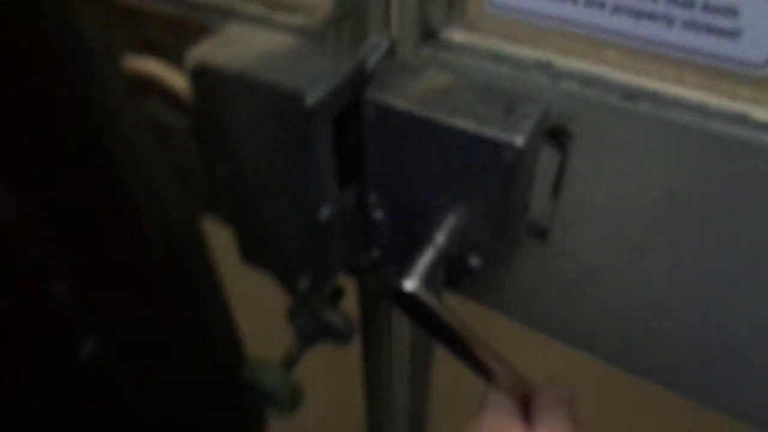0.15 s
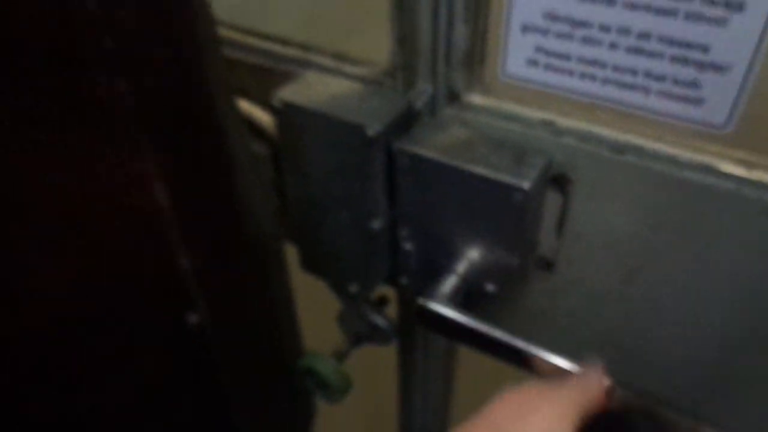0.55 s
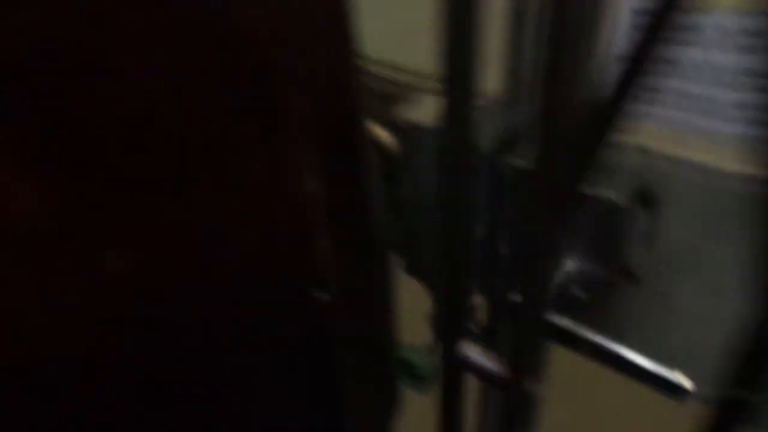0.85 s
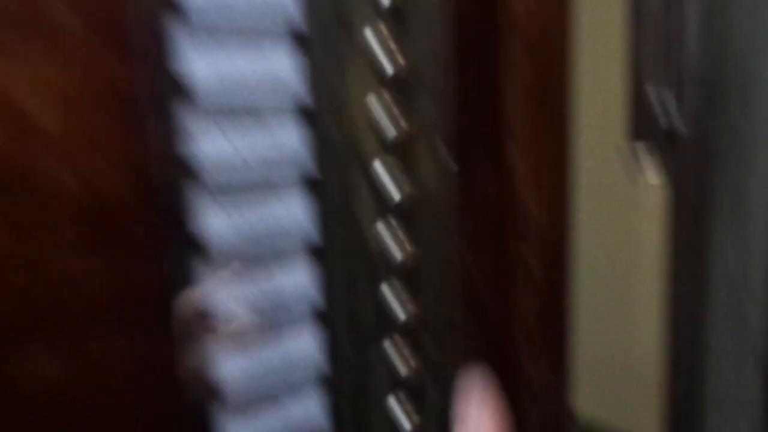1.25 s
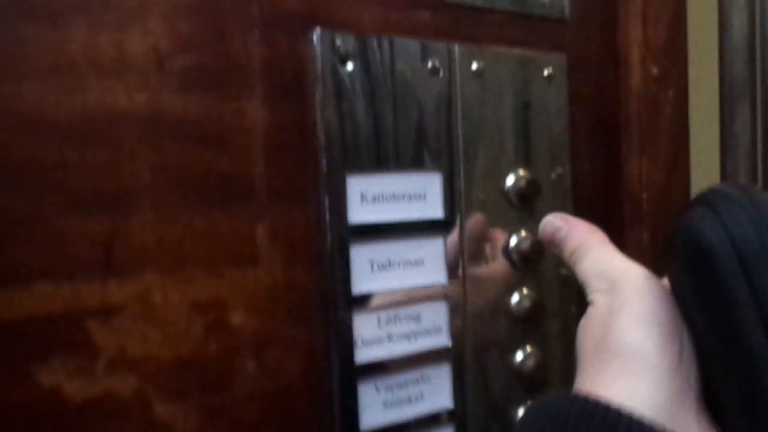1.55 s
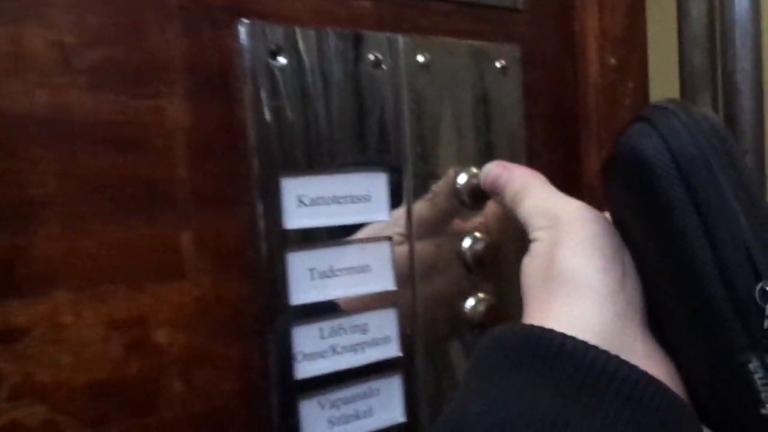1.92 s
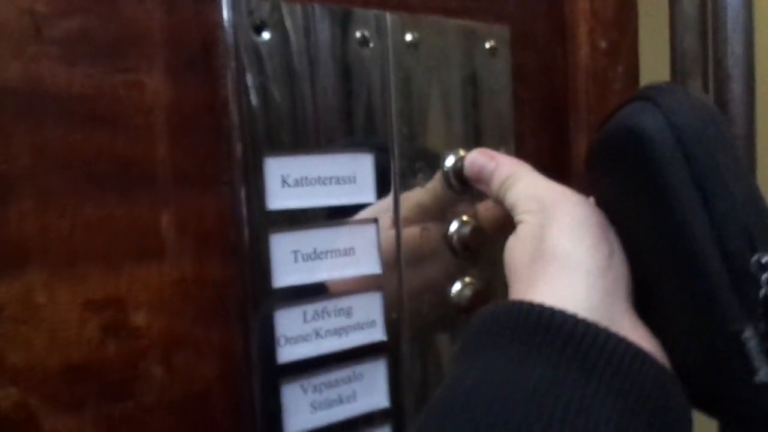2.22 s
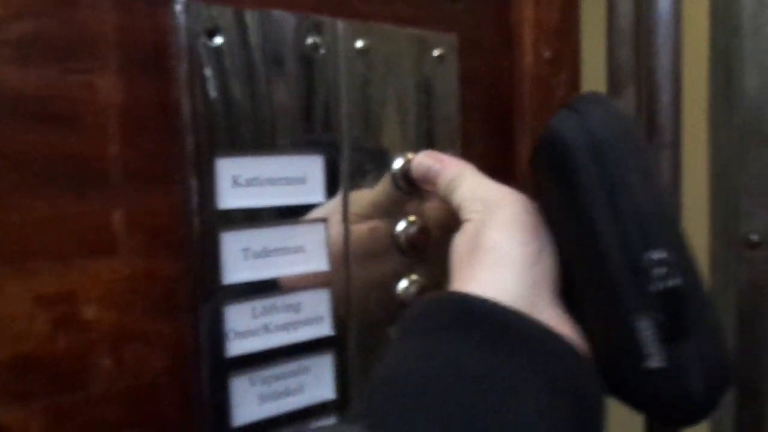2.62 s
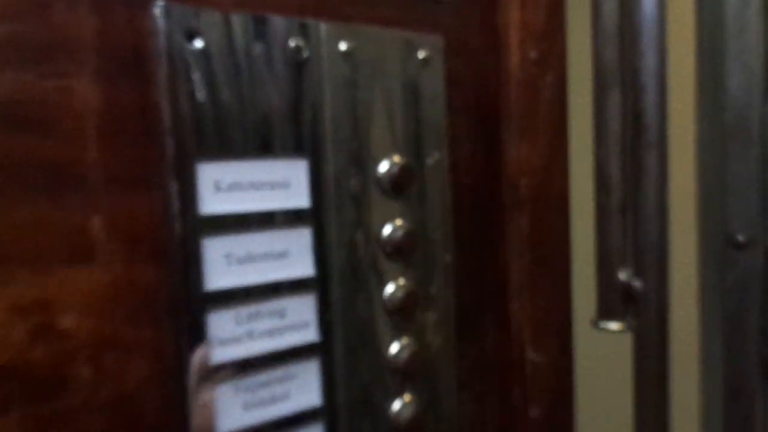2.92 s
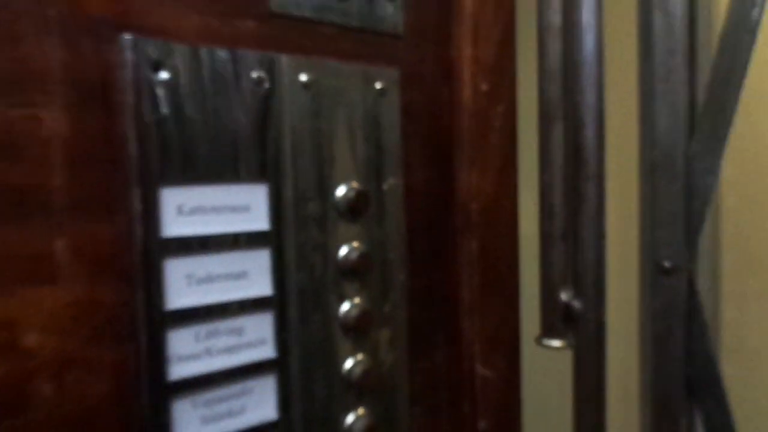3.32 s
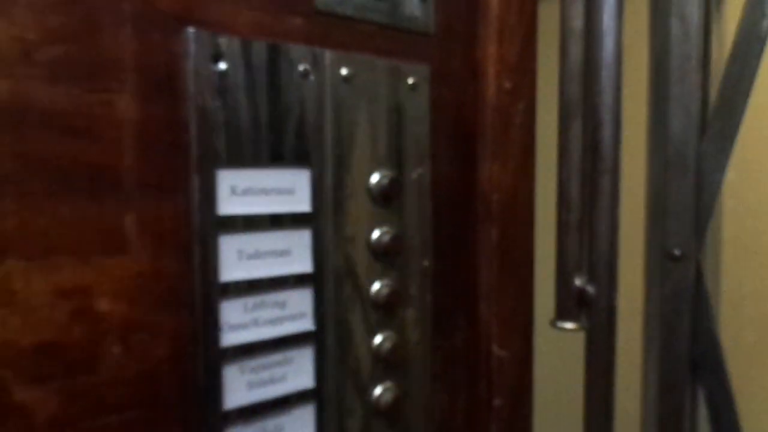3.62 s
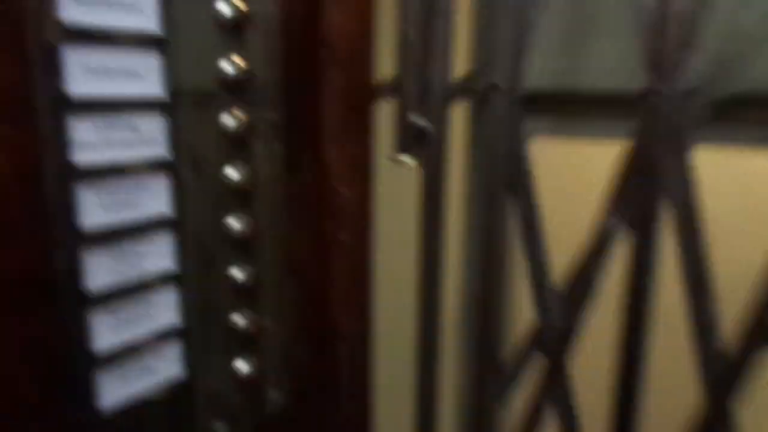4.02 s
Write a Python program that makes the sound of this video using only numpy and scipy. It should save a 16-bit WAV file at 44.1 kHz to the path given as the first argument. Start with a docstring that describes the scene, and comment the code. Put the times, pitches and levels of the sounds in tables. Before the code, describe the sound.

An old lift is closed and set going, heard by a close, nearly mono microphone. Light ticks and high squeaks lead to a door thud; the metal scissor gate clatters harshly, its peaks overloaded, and its bars shake and settle. Near silence with faint air hiss follows, then small switch clicks, a sharper brake clack and an unsteady, low motor hum with gear whirr, knocks and tiny pin ticks.

```python
"""A steel scissor gate is slammed and rattles out inside a small wooden lift car: noise bursts and damped modes.
Before it a door handle ticks, a hinge squeals (unsteady sines), the latch snaps and the door lands in its frame.
After it a button and relays click, the brake lets go with a clack and the drive hums and whirrs (tones, noise).
Loose bars shake in dense noise; the shaft echoes, and still air and a deep sway lie under everything.
The microphone is close by; the sound is nearly mono, with a faint stereo side that switches on and off."""
import sys
import numpy as np
from scipy import signal
from scipy.io import wavfile
from scipy.ndimage import uniform_filter1d

SR = 44100
rng = np.random.default_rng(int(sys.argv[2]) if len(sys.argv) > 2 else 0)


def int16_out(signal):
    """Quantize to a 16-bit WAV file."""
    q = np.round(np.clip(np.atleast_2d(signal).T, -1, 1) * 32767)
    wavfile.write(sys.argv[1], SR, q.astype(np.int16))


def level_to_linear(level):
    """Convert decibel levels to linear amplitude factors, elementwise."""
    exponent = np.asarray(level, float) / 20
    return 10 ** exponent


N = 183808

# Blows, in all six tables: start_s, level_db, thud_db (re level), brightness_db, base_t60_s,
# near_hz (the mode nearest to where the blow lands)
# the gate slams, rattles out and settles
GATE_BLOWS = [(0.856, -16.5, -11.5, -7, 0.13, 1520), (0.864, -8.5, -27.5, -19, 0.16, 1320),
              (0.902, -12.5, -21.5, -4.5, 0.075, 3000), (0.906, -7.5, -15, -10.5, 0.27, 5000),
              (0.938, -3, -18, -10.5, 0.27, 3000), (0.961, -3.5, -18.5, -12, 0.32, 1070),
              (0.989, -3, -16, -15, 0.22, 1000), (1.032, -11, -23, -15.5, 0.14, 1400),
              (1.042, -12.5, -10, -5, 0.3, 630), (1.072, -11, -21, -9.5, 0.2, 1830),
              (1.128, -20.5, -9, -3, 0.17, 3000), (1.163, -13, -8.5, -11.5, 0.19, 1400),
              (1.199, -13, -13, -15.5, 0.18, 2200), (1.242, -23, -1, -4.5, 0.061, 89),
              (1.296, -16, -9, -17.5, 0.15, 1380), (1.359, -40, -6, 2.5, 0.38, 3000),
              (1.399, -23, -8, -12, 0.21, 150), (1.425, -16.5, -18.5, -14, 0.16, 3000),
              (1.451, -16.5, -13, -12.5, 0.18, 2200), (1.501, -31.5, -4, -3.5, 0.33, 526),
              (1.537, -21, -4, -16, 0.053, 1400), (1.597, -40, -11.5, -3.5, 0.13, 1400),
              (1.636, -35, -18, -16, .2, 1410), (1.667, -38, -17, -4, 0.3, 1400),
              (1.705, -19, -15, -19.5, 0.12, 1390), (1.773, -27, -5.5, -19.5, 0.12, 600)]
# the door lands in its frame and bounces
DOOR_BLOWS = [(0.445, -11, -9.5, -19, 0.2, 1150), (0.455, -10, -11.5, -18.5, 0.11, 118),
              (0.462, -0.5, -15.5, -12.5, 0.11, 1908), (0.495, -11.5, -11, -8, 0.19, 351),
              (0.527, -8, -16, -12.5, 0.31, 247), (0.588, -11, -13.5, -21, 0.22, 1893),
              (0.63, -15, -12.5, -10.5, 0.089, 1500), (0.74, -26, -1, -10, 0.39, 1500)]
# the latch snaps
LATCH_BLOWS = [(0.3816, -11.5, -20.5, -13.5, 0.062, 1896), (0.392, -13.5, -28, -24, 0.1, 1700)]
# the swinging door and its handle tick
SWING_BLOWS = [(0.005, -32.5, -20, -8.5, 0.044, 2000), (0.035, -34.5, -18, -15.5, 0.054, 2690),
               (0.079, -33.5, -2.5, -24, 0.16, 1900), (0.15, -33.5, -22, -22, 0.11, 1000),
               (0.238, -24.5, -13, -17, 0.1, 800), (0.286, -29.5, -13, -13.5, 0.24, 3600),
               (0.301, -33.5, -15.5, -20, .1, 1650)]
# the button and relays click
CLICK_BLOWS = [(1.965, -22, -16, -15.5, 0.14, 1410), (2.056, -42, -11, -18, 0.091, 1830),
               (2.17, -22, -14, -20, 0.101, 2250), (2.184, -27, -12, -26.5, 0.12, 800),
               (2.251, -25, -14, -16.5, 0.12, 1400), (2.455, -39, -26, -17.5, 0.37, 1000)]
# the brake lets go, the moving car knocks
KNOCK_BLOWS = [(2.71, -33, -7, -19, 0.066, 1500), (2.724, -15.5, -14, -7, 0.13, 2200),
               (2.739, -23.5, -13, -30.5, 0.11, 216), (2.799, -26, -12, -41, 0.39, 950),
               (3.45, -43, -7, -17, 0.24, 1305), (3.565, -22, -8, -19, 0.29, 392),
               (3.608, -40, -17.5, -25, 0.17, 217), (3.656, -32.5, -1, -23, 0.1, 1305),
               (3.678, -31, -16, -37, 0.14, 1305), (3.72, -36, -19, -27, 0.11, 1305),
               (3.765, -30, -7, -42, 0.19, 950), (3.78, -27, -7.5, -44, 0.16, 460),
               (3.819, -32.5, -21, -16.5, 0.25, 1590), (3.93, -36, -1, -24, 0.13, 283),
               (3.953, -28.5, -13.5, -13.5, 0.16, 1850), (4.097, -49, -6, -20, 0.11, 283),
               (4.129, -37, -26, -29, 0.15, 1090)]


def evened(x):
    """Scales to rms 1."""
    return x / np.sqrt(np.mean(x ** 2) + 1e-20)


def read(points, hz):
    """Reads a table on a log-frequency axis."""
    f, value = np.transpose(points)
    return np.interp(np.log(hz + 1), np.log(f + 1), value)


def columns(rows):
    """Curve columns sample by sample, and a mask that is 1 while the curve lasts, with 1.5 ms ramps."""
    s, *values = np.transpose(rows)
    t = np.arange(N) / SR
    on = np.clip(np.minimum(t - s[0], s[-1] - t) / 0.0015, 0, 1)
    return on, *(np.interp(t, s, v) for v in values)


def shaped(x, gain):
    """Minimum-phase filter with the spectral shape gain(hz), scaled to unit energy."""
    log_gain = np.log(np.maximum(gain(abs(np.fft.fftfreq(8192, 1 / SR))), 1e-5))
    taps = np.fft.ifft(np.exp(np.conj(signal.hilbert(log_gain)))).real[:4096]
    return signal.oaconvolve(x, taps / np.linalg.norm(taps))[:len(x)]


def rings(hz, modes):
    """Magnitude of a set of resonances, their powers added."""
    return np.sqrt(sum(level_to_linear(2 * db) / (1 + (2 * (hz - f) / width) ** 2) for f, width, db in modes))


def band(hz, low_hz, high_hz):
    """Smooth band-pass magnitude."""
    return 1 / np.sqrt((1 + (low_hz / (hz + 1)) ** 10) * (1 + (hz / high_hz) ** 10))


def wander(count, size):
    """Smooth random drift of rms 1, about size samples a wiggle."""
    once = uniform_filter1d(rng.standard_normal(count), size=size)
    return evened(uniform_filter1d(once, size=size))


def contacts(per_s, spread_db, last_s, steady):
    """Envelope of many small knocks, a few stronger, over a steady share."""
    strength = level_to_linear(spread_db * np.minimum(rng.exponential(1, N + SR), 4))
    knocks = strength * (rng.random(N + SR) < per_s / SR)
    return evened(steady + signal.lfilter([1], [1, -np.exp(-1 / (last_s * SR))], knocks))


def tone(rows, waver_hz, flutter_db, size):
    """A sine on a pitch and level curve (s, Hz, rms dB), both made unsteady."""
    on, hz, db = columns(rows)
    phase = 2 * np.pi * np.cumsum(hz + waver_hz * wander(N, size)) / SR
    return np.sqrt(2) * on * level_to_linear(db + flutter_db * wander(N, size)) * np.sin(phase)


def struck_car(thud, blow, clink, crack):
    """Four noise drives ring the wooden panels, the long bars, the short bars and the bright pin joints."""
    # resonances of gate and door frame: pitch_hz, width_hz, level_db
    steel_modes = [(1035, 210, 4.5), (1904, 870, 4), (2405, 460, 0), (2760, 26, -28.5), (3387, 210, -17),
                   (3770, 67, -8), (4460, 220, -8.5), (5420, 11, -3.5), (6140, 65, -56)]
    # resonances of the wooden car: pitch_hz, width_hz, level_db
    cabin_modes = [(118, 75, -7), (160, 19, 4), (230, 51, 7.5), (267, 36, -5.5), (304, 26, 0.5),
                   (360, 120, 5.5), (384, 13, 1), (460, 31, 1), (557, 56, 2)]
    # colour of the steel between its resonances: pitch_hz, relative_level_db
    steel_body = [(290, -44.5), (500, -4), (668, 11), (1070, 10.5), (1430, 6), (2320, -3), (9000, -4),
                  (11700, -1), (19800, -120)]
    # colour of the pin joints: pitch_hz, relative_level_db
    pin_colour = [(3530, -43.5), (6000, 0), (9220, 5.5), (13100, 6.5), (15000, -4), (15500, -42.5),
                  (15600, -5.5)]

    def steel(hz):
        return level_to_linear(read(steel_body, hz) - 2.0) + rings(hz, steel_modes)

    panels = shaped(thud, lambda hz: rings(hz, cabin_modes) * band(hz, 90, 750))
    sway = level_to_linear(-19.5) * shaped(thud, lambda hz: band(hz, 36, 60))  # the car sways under thuds
    long_bars = shaped(blow, lambda hz: steel(hz) * band(hz, 430, 3060))
    short_bars = shaped(clink, lambda hz: steel(hz) * band(hz, 2820, 7000))
    pins = shaped(crack, lambda hz: level_to_linear(read(pin_colour, hz)) * band(hz, 5100, 20000))
    return panels + sway + long_bars + short_bars + pins


def blows():
    """Each blow is a burst of tiny contacts; the treble dies first, the thud rises slowly and lasts."""
    drives, t = np.zeros((4, N + SR)), np.arange(SR // 2) / SR
    # rows: thud, blow, clink, crack
    lasts = np.array([[1.6], [1.05], [.8], [.65]])  # share of the blow's t60
    rise_s = np.array([[.006], [.0012], [.0005], [.0003]])
    chatter = contacts(per_s=460, spread_db=2.5, last_s=0.0045, steady=1.0)
    every_blow = SWING_BLOWS + LATCH_BLOWS + DOOR_BLOWS + GATE_BLOWS + CLICK_BLOWS + KNOCK_BLOWS
    for s, db, thud_db, bright_db, t60, _ in every_blow:
        clink_db = -1.5 + 0.85 * bright_db
        crack_db = -4.5 + 1.26 * bright_db
        layer_db = db + np.array([[thud_db], [-9.0], [clink_db], [crack_db]])
        at = round(s * SR)
        fade = level_to_linear(layer_db - 60 * t / (lasts * max(t60, .01))) * (1 - np.exp(-t / rise_s))
        fade[2:] *= 1 + 0.68 * np.exp(-t / 0.001)  # the snap of first contact
        # a firm front, then chatter
        fade[1:] *= 1 + 0.35 * (chatter[at:at + len(t)] - 1) * (1 - np.exp(-t / 0.0083))
        drives[:, at:at + len(t)] += fade * rng.standard_normal((len(t), 4)).T
    return struck_car(*drives)[:N]


def rung():
    """Modes of every struck thing, once per blow, weaker far from the point of contact: (s, dB, Hz, t60 s)."""
    # modes of each struck thing, in all six tables: pitch_hz, level_db (re the blow), t60_s
    gate_modes = [(89, -8, .8), (526, -3.5, 0.12), (630, -5, 0.09), (1070, -4.5, .09), (1830, -7, 0.073),
                  (2200, -7, 0.12), (3000, -23, 0.025)]
    door_modes = [(118, -6.5, 0.48), (247, -10.5, .35), (351, -6, 0.09), (600, -6, .08), (790, -2.5, .12),
                  (942, 3.5, 0.024), (3120, 0.5, 0.091)]
    latch_modes = [(1718, 10.5, .02), (2114, -1, 0.048), (2330, -1, 0.037), (4280, 2, .035)]
    swing_modes = [(1080, 0.5, .09), (1650, -2, .3), (2690, -5, 0.18), (3360, -3.5, 0.12), (3860, -13, .06),
                   (4226, 0, .035)]
    click_modes = [(916, -5, .045), (1084, -4, 0.095), (1386, -16, 0.032), (1830, -5.5, 0.072),
                   (2250, -4, 0.042)]
    knock_modes = [(216.4, 0, .28), (283, 5.5, .08), (460, -3, .09), (770, -1, .12), (950, -2, .05),
                   (1305, -3.5, 0.081), (1588, 0.5, 0.062), (3974, 4.5, 0.028)]
    fall_db_per_octave, spread_db = 11, 1.5
    notes = []
    for rows, modes in [(SWING_BLOWS, swing_modes), (LATCH_BLOWS, latch_modes), (DOOR_BLOWS, door_modes),
                        (GATE_BLOWS, gate_modes), (CLICK_BLOWS, click_modes), (KNOCK_BLOWS, knock_modes)]:
        for s, db, *_, near_hz in rows:
            for hz, mode_db, t60 in modes:
                far_db = fall_db_per_octave * abs(np.log2(hz / near_hz))
                level_db = db + mode_db - far_db + spread_db * rng.standard_normal()
                notes.append((s, level_db, hz, t60))
    return notes


def pings():
    """One damped mode each, roughened by chattering contact; the shortest are dry ticks."""
    # small loose pins ticking on one note: start_s, level_db, pitch_hz, t60_s
    pin_ticks = [(3.831, -22.5, 3520, 0.003), (3.838, -29.5, 3020, .035), (3.8395, -28, 11620, 0.0034),
                 (3.848, -31.5, 4650, 0.042), (3.8483, -14, 2120, 0.0033), (3.855, -26, 2480, 0.0036),
                 (3.878, -35.5, 6700, .005), (3.8792, -25, 2270, 0.0051), (3.9745, -16.5, 4520, 0.0016),
                 (3.9748, -26, 12000, 0.0039), (4.097, -38, 2510, .005)]
    out = np.zeros(N + SR)
    for s, db, hz, t60 in rung() + pin_ticks:
        t = np.arange(round(max(t60, .1) * SR)) / SR
        soft = 1 - np.exp(-t / (0.032 * t60))
        rough = 1.09 * wander(len(t), size=60 + round(3 * SR / hz))  # radians
        phase = 2 * np.pi * (hz * t + rng.random()) + rough
        out[round(s * SR):][:len(t)] += level_to_linear(db - 60 * t / t60) * soft * np.sin(phase)
    return out[:N]


def shake():
    """Loose bars and pins knock densely, each knock dying within milliseconds."""
    # curve of the shaking: time_s, level_db, brightness_db, boom_db (of the car)
    shaking = [(0.0, -46.5, 3, -1), (0.066, -46.5, -10, -4), (.096, -45, -9, 4), (0.248, -43.5, -2.5, -0.5),
               (0.37, -45, -11.5, 5), (0.44, -38, -2.5, 4.5), (0.46, -36.5, 8, 18), (0.564, -33, -5.5, 0.5),
               (0.74, -37, -6, 5), (0.84, -36, -14.5, -18), (0.896, -40, -6, 7), (0.906, -29.5, 16, 9.5),
               (0.972, -22, 9, 3.5), (1.036, -24.5, 4.5, 2), (1.118, -26, 1, 0.5), (1.134, -24.5, 6, -2),
               (1.21, -29.5, 4, 3.5), (1.384, -38, -2.5, -9), (1.498, -44.5, 6.5, -1),
               (1.65, -44.5, -9, -6), (1.786, -46, -10, 9), (1.852, -67.5, -19, 14), (1.95, -67, -22, 21)]
    on, db, bright_db, boom_db = columns(shaking)
    clink_db = -1.1 + bright_db
    sizzle_db = -4 + 1.22 * bright_db
    swarm = contacts(per_s=260, spread_db=5.0, last_s=0.013, steady=0.55)[:N]
    z = rng.standard_normal((N, 4)).T * on * level_to_linear(db)
    z[1:] *= swarm  # the boom stays smooth
    return struck_car(z[0] * level_to_linear(boom_db), z[1], z[2] * level_to_linear(clink_db), z[3] * level_to_linear(sizzle_db))


def squeaks():
    """The hinge squeals by stick-slip: each note swells, holds, then glides and fades."""
    # squeals: start_s, length_s, top_level_db, first_hz, last_hz, waver_hz
    squeals = [(0, 0.028, -33, 8720, 8720, 18), (0.037, 0.22, -28, 8720, 8420, 16),
               (0.305, 0.052, -26.5, 8710, 8720, 16), (0.353, .096, -20.5, 8496, 8470, 68),
               (0.398, 0.056, -32, 8560, 8750, 16), (0.62, .047, -33, 8700, 8550, 18),
               (0.624, 0.071, -29, 8470, 8540, 78)]
    rise, hold = .15, .45  # shares of the note
    edge_db, end_db = -8.5, -21  # levels at its two ends, re the top
    out = np.zeros(N)
    for s, length_s, db, hz, last_hz, waver_hz in squeals:
        curve = [(s, hz, db + edge_db),
                 (s + rise * length_s, hz, db),
                 (s + (rise + hold) * length_s, hz, db),
                 (s + length_s, last_hz, db + end_db)]
        out += tone(curve, waver_hz, flutter_db=2.0, size=150)
    return out


def drive():
    """Rumble, gear whirr in narrow resonances, hiss, and two wavering motor tones."""
    # drive running: time_s, rumble_db, whirr_db (of the gear)
    running = [(2.44, -72.5, -59), (2.47, -61, -44.5), (2.52, -41, -40.5), (2.6, -43.5, -46.5),
               (2.7, -42.5, -54), (2.76, -48, -32.5), (2.85, -42.5, -40), (3.05, -46.5, -46),
               (3.3, -49.5, -53), (3.55, -48.5, -52.5), (3.7, -47.5, -41.5), (3.8, -50, -49.5),
               (3.9, -50.5, -61), (4.08, -56.5, -58), (4.168, -54, -49)]
    # resonances of the gear: pitch_hz, width_hz, level_db
    gear_modes = [(220, 27, 1.5), (315, 17, -4.5), (445, 6.8, 3.5), (504, 36, 1), (641, 68, -5.5),
                  (793, 37, 2.5), (934, 13.5, 3), (1025, 69, -8), (1224, 30, -1.5), (1000, 560, -8),
                  (1700, 820, -21.5)]
    # level of the hum: time_s, level_db
    hum_level = [(2.5, -72), (2.574, -40), (2.694, -52), (2.75, -38), (2.96, -54), (3.028, -60),
                 (3.07, -40), (3.186, -41.5), (3.21, -58), (3.264, -41), (3.357, -53.5), (3.428, -42.5),
                 (3.52, -53), (3.66, -39), (3.714, -48.5), (3.923, -60), (3.946, -49), (4.168, -59.5)]
    # pitch of the hum: time_s, pitch_hz
    hum_pitch = [(2.5, 152), (3.0, 151), (3.07, 157.7), (3.33, 153), (3.6, 153.5), (3.75, 156)]
    # whine: time_s, pitch_hz, level_db
    whine_curve = [(2.95, 504, -60), (3.12, 512, -51.5), (3.176, 510, -41.5), (3.21, 509, -57),
                   (3.36, 518.4, -55), (3.434, 518.5, -72)]
    on, rumble_db, whirr_db = columns(running)
    hiss_db = -49 + 1.46 * (whirr_db + 40)  # moves faster than the whirr
    z = rng.standard_normal((N, 3)).T * on * level_to_linear([rumble_db, whirr_db, hiss_db])
    rumble = shaped(z[0], lambda hz: rings(hz, gear_modes) * band(hz, 130, 416))
    sway = level_to_linear(-12.5) * shaped(z[0], lambda hz: band(hz, 36, 99))  # the car sways under way
    whirr = shaped(z[1], lambda hz: rings(hz, gear_modes) * band(hz, 510, 2960))
    hiss = shaped(z[2], lambda hz: band(hz, 1200, 3430) + .3 * band(hz, 1300, 6000) + .08)
    hum_curve = [(s, np.interp(s, *np.transpose(hum_pitch)), db) for s, db in hum_level]
    hum = tone(hum_curve, waver_hz=1.8, flutter_db=2.5, size=1500)
    whine = tone(whine_curve, waver_hz=5.9, flutter_db=2.5, size=800)
    return rumble + sway + whirr + hiss + hum + whine


def echo(x):
    """The shaft's echo: a sparse tail of random sign, each band dying at its own speed."""
    # decay of the shaft: pitch_hz, t60_s
    shaft_decay = [(100, 0.1), (300, 0.33), (1000, 0.67), (3000, 0.2), (8000, 0.14), (15000, 0.27)]
    taps = np.zeros(SR)
    at = np.arange(200, SR - 20, 20) + rng.integers(0, 20, (SR - 201) // 20)
    taps[at] = rng.choice([-1., 1.], len(at))
    hz, t, z = signal.stft(taps, SR, nperseg=256)
    decay = level_to_linear(-60 * t / read(shaft_decay, hz)[:, None])
    tail = signal.istft(z * decay, SR, nperseg=256)[1]
    return signal.fftconvolve(x, tail / np.linalg.norm(tail))[:N]


def background():
    """Still air with microphone hiss, and the deep sway of the car at rest: two shaped noises."""
    # colour of air and hiss: pitch_hz, relative_level_db
    air_colour = [(12, -29.5), (20, 9), (27, -30), (145, -5), (267, -22.5), (316, -4), (937, -7.5),
                  (1930, -13.5), (4990, -20), (13600, -22), (15600, -30.5)]
    air = level_to_linear(-54.5) * shaped(rng.standard_normal(N), lambda hz: level_to_linear(read(air_colour, hz)))
    sway_db = -67.5 + 4 * wander(N, size=4000)
    sway = shaped(rng.standard_normal(N) * level_to_linear(sway_db), lambda hz: band(hz, 35, 85))
    return air + sway


def faint_side(mid):
    """A faint stereo side that switches on and off: the middle with its phases scattered."""
    # level of the side: pitch_hz, level_db (re the middle)
    side_level = [(60, -12), (180, -23.5), (550, -20.5), (1650, -14.5), (4970, -9.5), (15000, -9)]
    # when the side is on (a row that ends before it starts stays off): from_s, to_s
    on_spans = [(.3, 0.33), (0.393, .42), (0.463, 0.47), (0.643, 0.69), (0.905, 1.035), (1.109, 1.18),
                (1.202, 1.235), (1.322, 1.387), (1.556, 1.63), (1.739, 1.78), (1.84, 1.9), (2.2, 2.24),
                (2.5, 2.55), (2.63, 2.71), (2.912, 2.94), (3.17, 3.3), (3.44, 3.4), (3.63, 3.74),
                (3.86, 4.04), (4.01, 3.7)]
    hz, t, z = signal.stft(mid, SR, nperseg=512)
    on = sum(np.clip(np.minimum(t - a, b - t) / .015 + 0.1, 0, 1) for a, b in on_spans)
    scatter = np.exp(2j * np.pi * rng.random(z.shape[::-1]).T)
    z *= on * scatter * level_to_linear(read(side_level, hz))[:, None]
    return signal.istft(z, SR, nperseg=512)[1][:N]


def scene():
    """Sources, their echo and the background, nearly mono, with the faint side laid over left and right."""
    small = pings()  # close to the microphone: less of this reaches the shaft
    near = blows() + shake() + squeaks() + drive()
    shaft = level_to_linear(-10.0) * echo(near + level_to_linear(-5.0) * small)
    mid = near + small + shaft + background()
    side = faint_side(mid)
    return np.array([mid + side, mid - side])


def low_pass(x):
    """Removes everything above the highest recorded frequency."""
    return signal.sosfilt(signal.butter(12, 15800, fs=SR, output="sos"), x)


def record(dry):
    """The converter overloads: peaks beyond full scale are cut flat."""
    mix = np.clip(dry, -1, 1)
    return low_pass(mix)


dry = scene()
out = record(dry)
int16_out(out)
```